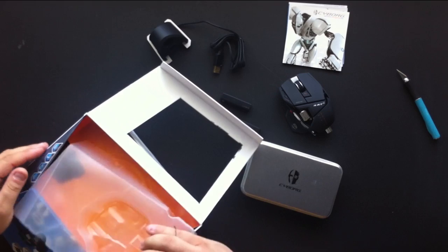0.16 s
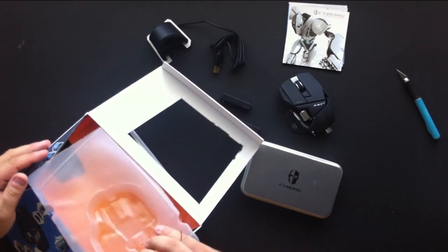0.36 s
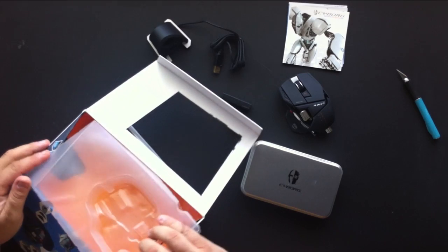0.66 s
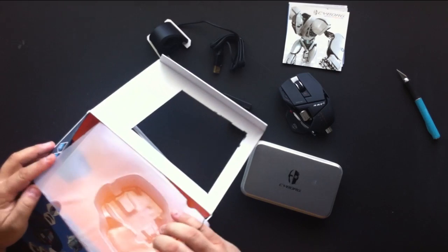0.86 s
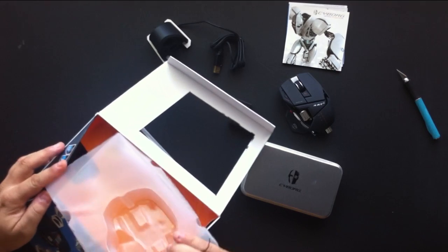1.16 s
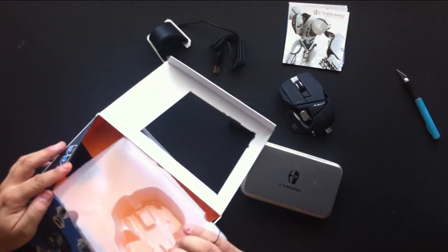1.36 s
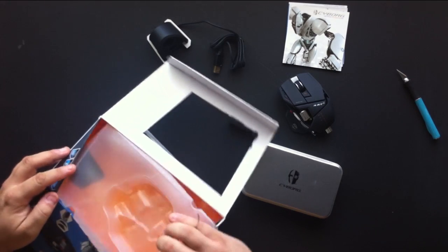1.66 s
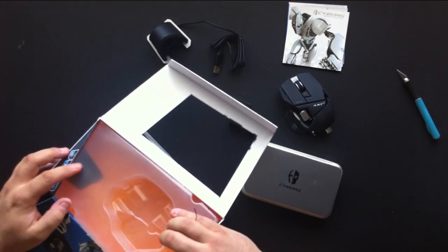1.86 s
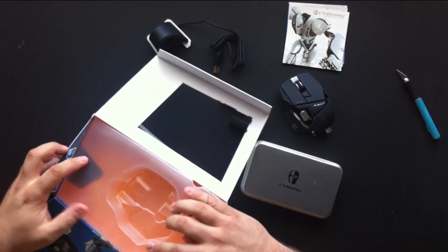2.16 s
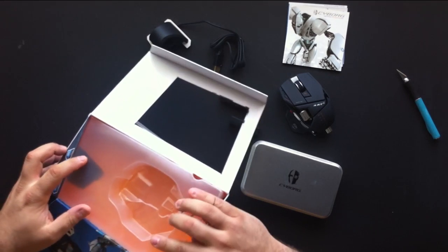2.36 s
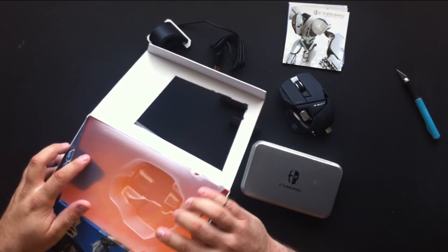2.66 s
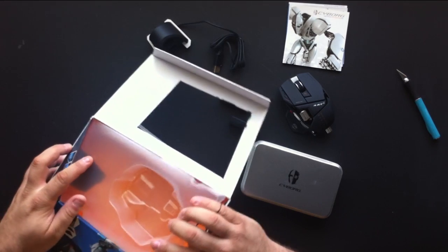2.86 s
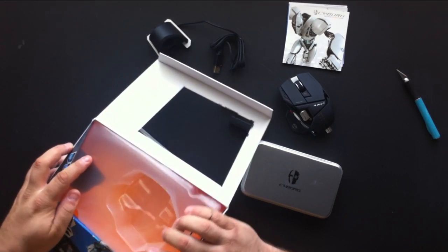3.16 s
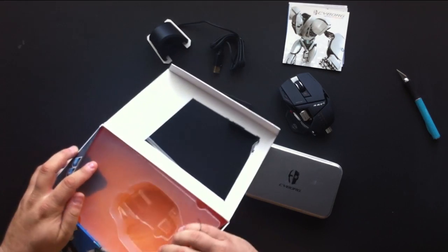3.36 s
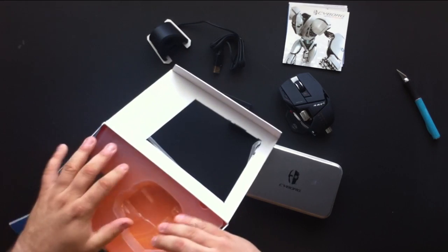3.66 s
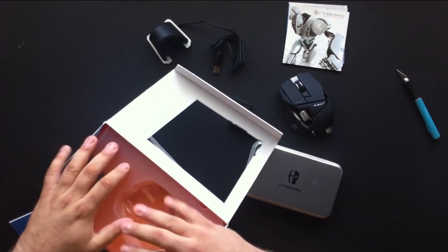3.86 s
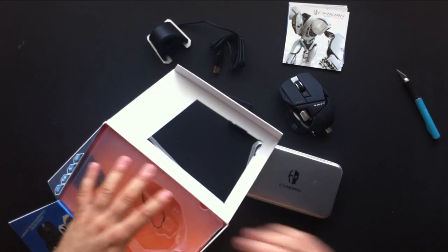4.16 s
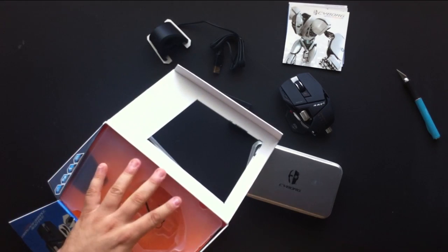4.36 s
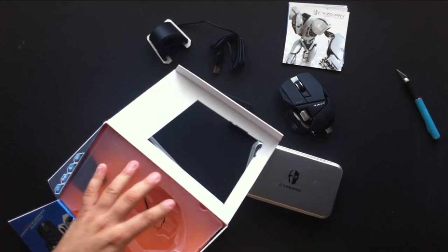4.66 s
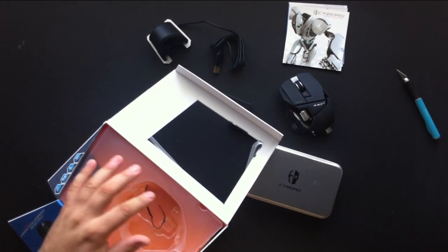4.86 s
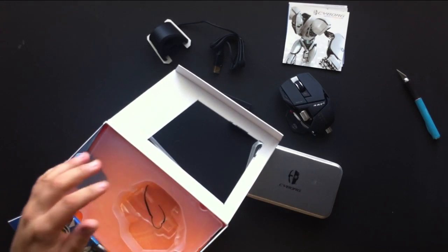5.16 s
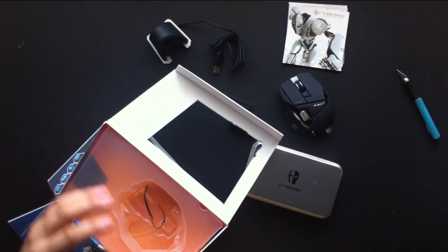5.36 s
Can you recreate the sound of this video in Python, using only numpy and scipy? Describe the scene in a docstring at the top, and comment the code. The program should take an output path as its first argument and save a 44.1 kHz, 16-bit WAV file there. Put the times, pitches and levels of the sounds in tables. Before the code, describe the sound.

A faint steady electrical hum and soft hiss lie under everything in a small room with a short echo, picked up closely. From about 0.2 to 0.6 seconds, a plastic tray knocks the cardboard box in a loose cluster of hollow, boxy taps with brief rubs. It grows quieter until 1.4, with only faint scuffing. At 1.44 a bright plastic click and double knock break out, followed by more clacks and scrapes from 1.65 to 1.9. After softer rubbing, a knock at 2.5 leads to the loudest, sharpest snap at 2.65. Stuttering scrapes and crinkles run from 2.8 to 3.5, then a firm knock lands at 3.57 with smaller ones to 3.85. From 3.95 to 4.45 light, dry clicks scatter through gentle finger rubbing. Sparse hollow finger taps come near 4.95 and 5.13, a short brush at 5.23, then a faint last rub fading into the room's quiet.

```python
"""Two hands press a moulded plastic tray back into a cardboard box on a table, in a small room.
A faint hum of sine lines and a hiss of shaped noise are there from the start and lie under everything.
Soon the tray knocks on the box, as damped modes with noisy cracks, and rubs down its walls by stick-slip.
Then patches of the thin plastic click as they buckle, and the tray snaps into place.
Late on, the plastic still clicks while fingers tap the hollow tray and brush it."""
import sys
import numpy as np
from scipy import signal
from scipy.io import wavfile
from scipy.ndimage import uniform_filter1d

SR = 44100
rng = np.random.default_rng(int(sys.argv[2]) if len(sys.argv) > 2 else 0)


def bounce(signal):
    """Save signal as a 16-bit WAV file at the path given by the first command-line argument."""
    frames = np.transpose(np.atleast_2d(signal))
    limited = np.clip(frames, -1, 1)
    pcm = np.round(limited * 32767).astype(np.int16)
    wavfile.write(sys.argv[1], SR, pcm)


N = 243431


def amp(db):
    """Decibel law: the amplitude ratio of a level."""
    return 10 ** (np.asarray(db) / 20)


def unit(x):
    """Normalisation of power: scales to rms 1."""
    return x / np.sqrt(np.mean(x ** 2) + 1e-20)


def attack_unit(x, size=350):
    """Normalisation of the onset: scales a hit so that its first samples have rms 1."""
    return x / np.sqrt(np.mean(x[:size] ** 2) + 1e-20)


def unit_energy(x):
    """Normalisation of energy: scales the sum of squares to 1."""
    return x / np.linalg.norm(x)


def read(points, hz):
    """Logarithmic pitch scale: interpolates a table along log frequency."""
    f, value = np.transpose(points)
    return np.interp(np.log(hz + 1), np.log(f + 1), value)


def near(hz, centre_hz, octaves):
    """Resonance curve: a bell of height 1 around centre_hz."""
    return 1 / (1 + (np.log2(hz / centre_hz) / octaves) ** 2)


def add(mix, s, sound):
    """Superposition: mixes a sound in at time s."""
    part = mix[max(round(s * SR), 0):][:len(sound)]
    part += sound[:len(part)]


def through(x, response):
    """Convolution: passes x through an impulse response."""
    return signal.oaconvolve(x, response)[:len(x)]


def pulse_of(spectrum, focus_hz=1000, focus_db=0, size=2048):
    """Minimum phase: the shortest causal pulse with this spectrum, raised around focus_hz."""
    hz = abs(np.fft.fftfreq(size, 1 / SR))
    gain_db = read(spectrum, hz) + focus_db * near(hz + 1, focus_hz, octaves=0.062)
    log_gain = np.log(amp(gain_db))
    # the Hilbert transform of the log gain is the phase
    pulse = np.fft.ifft(np.exp(np.conj(signal.hilbert(log_gain)))).real
    return unit_energy(pulse)


def ringing(modes, t):
    """Modal decay: one dying sine a mode, as rows."""
    hz, db, t60 = np.transpose(modes)[:, :, None]
    return amp(db - 60 * t / t60) * np.sin(2 * np.pi * hz * t)


# Spectrum of the hiss. Each row: frequency in Hz, relative density in dB.
HISS_SPECTRUM = [(18, -44), (30, -14), (98, -17), (204, -4), (239, 0), (702, -9.5), (866, 0.5),
                 (962, -10.5), (2750, -15.5), (3870, -18), (5040, -18), (7270, -23), (10200, -24),
                 (16000, -25.5)]
# Lines of the hum. Each row: frequency in Hz, rms level in dB.
HUM_LINES = [(120, -76), (242, -80.5), (759, -96), (894, -80)]


def background(hiss_db=-62.5, waver_rad=0.029):
    """Stationary noise and tones: a steady hiss and a few hum lines of slightly wavering phase."""
    t = np.arange(N) / SR
    hiss = through(rng.standard_normal(N), pulse_of(HISS_SPECTRUM, size=8192))
    out = amp(hiss_db) * unit(hiss)
    knots = np.linspace(0, t[-1], num=40)
    for hz, db in HUM_LINES:
        drift = waver_rad * np.interp(t, knots, rng.standard_normal(len(knots)))
        out += amp(db) * np.sqrt(2) * np.sin(2 * np.pi * hz * t + drift)
    return out


# Decay of the room. Each row: frequency in Hz, t60 in seconds.
ROOM_DECAY = [(150, 0.51), (400, 0.37), (1200, 0.4), (3000, 0.45), (7000, 0.44), (12000, 0.34)]


def echoes(first_s=0.0037):
    """Diffuse reverberation from one place: dense reflections, each band dying at its own speed."""
    t = np.arange(SR // 3) / SR
    reflections = rng.standard_normal(len(t)) * (t > first_s)
    hz, when, bands = signal.stft(reflections, SR, nperseg=256)
    decay = amp(-60 * when / read(ROOM_DECAY, hz)[:, None])
    tail = signal.istft(bands * decay, SR, nperseg=256)[1][:len(t)]
    return unit_energy(tail)


# First reflections from the table and the lid. Each row: delay in seconds, level in dB re the direct sound.
FIRST_REFLECTIONS = [(.0021, -4), (.0049, -4), (.0088, -6)]


def crack(t, t60, contact_s, room_db, tick=0.81):
    """High modal density: a contact sets countless short-lived sheet modes fluttering, like dying noise."""
    first = unit_energy(rng.standard_normal(len(t)) * amp(-60 * t / t60))
    first[0] += tick
    first *= 1 - np.exp(-(t + 1 / SR) / contact_s)  # a soft contact swallows the first tick
    first = unit_energy(first)
    out = first + amp(room_db) * echoes()
    for delay_s, db in FIRST_REFLECTIONS:
        add(out, delay_s, amp(db) * first)
    return out


# Knocks of the tray on the box and, late, finger taps on the hollow tray. Each row: nominal start in
# seconds, relative level in dB, thud of the box in relative dB, hardness (snap) in relative dB,
# Hz at which the box is driven most, Hz at which the tray is driven most.
KNOCKS_AND_TAPS = [(0.1975, -31.5, -3, -9, 516, 800), (0.2485, -39, 1, -21, 352, 990),
                   (0.29, -35, -0.5, -12, 470, 780), (0.309, -41.5, 6, -22, 386.4, 724),
                   (0.424, -37, -12, -13, 350, 1700), (0.467, -37, -5.5, -11.5, 540, 1110),
                   (0.4848, -43.5, 6.5, -6, 361, 1020), (0.6224, -47.5, 1, -13, 360, 790),
                   (0.9034, -53.5, 5.5, -6, 724, 735), (1.2751, -57.5, 13.5, -26, 527, 920),
                   (1.4434, -28, 1.5, -4.5, 473, 1920), (1.4726, -30.5, -4.5, -17, 437, 758),
                   (1.6643, -35.5, -13, -10, 312, 1110), (1.6935, -27, -23, -8.5, 476, 1575),
                   (1.7552, -35.5, -4, -21, 793, 824), (1.8826, -38.5, 8.5, -2, 303, 775),
                   (1.9, -28.5, -6.5, -24.5, 336, 1125), (2.2425, -43, 2.5, -9.5, 590, 1170),
                   (2.5183, -28.5, 3, -19, 418, 1224), (2.6504, -21.5, -2.5, 2, 429, 1220),
                   (2.9266, -41, 0.5, -6, 314, 1160), (3.0671, -42.5, -4.5, -5, 337, 760),
                   (3.235, -41, -0.5, -5.5, 473, 900), (3.5709, -26, -1, -7, 397.5, 974),
                   (3.6512, -40.5, 5.5, 4, 422, 1690), (3.6806, -30.5, -7, -8, 781, 1070),
                   (3.8466, -30, -12, -10.5, 272, 1894), (4.4379, -43.5, -4.5, -14, 414, 1160),
                   (4.9372, -36, -14, -14, 820, 843), (4.9697, -38, -3, -8.5, 750, 730),
                   (5.1255, -44, -3.5, -15, 770, 776)]
# a knock heavier than HEAVY_DB drives the box onto the table: a second, duller knock just after
HEAVY_DB = -35
# delay in seconds, then level, thud and hardness in dB re those of the knock
LANDING_S, LANDING_DB, LANDING_THUD_DB, LANDING_SNAP_DB = .009, -13.5, 9.5, -9


def contacts():
    """Secondary impact: every knock and tap, and after each heavy knock the box landing on the table."""
    rows = list(KNOCKS_AND_TAPS)
    for s, db, thud_rel, snap_rel, box_hz, tray_hz in KNOCKS_AND_TAPS:
        if db > HEAVY_DB:
            levels = db + LANDING_DB, thud_rel + LANDING_THUD_DB, snap_rel + LANDING_SNAP_DB
            rows.append((s + LANDING_S, *levels, box_hz, tray_hz))
    return rows


# Modes of the cardboard box. Each row: frequency in Hz, relative level in dB, undamped t60 in seconds.
BOX_MODES = [(126, -10.5, 0.11), (218, -31, 0.3), (233.2, -12.5, 0.29), (311.4, -2, 0.18),
             (353.7, -6, 0.23), (399.4, 4, 0.056), (457.2, 0.5, 0.085), (483.2, -5, 0.16),
             (550.6, -4.5, 0.076), (619.7, -9.5, 0.097), (682, -5, 0.071), (751, -9, 0.085)]
# Modes of the plastic tray. Each row: frequency in Hz, relative level in dB, undamped t60 in seconds.
TRAY_MODES = [(787, 7, 0.05), (922, 3.5, 0.25), (953, 0, 0.05), (1139, 7, 0.087), (1299, 7, 0.032),
              (1399, 5, 0.041), (1650, -2, 0.23), (1677, 7, 0.066), (1912, -13.5, 0.19), (2370, -8.5, 0.15),
              (2680, -11, 0.14), (3015, 6, 0.04)]
# Modes of the tray's thin rim. Each row: frequency in Hz, relative level in dB, t60 in seconds.
RIM_MODES = [(2683, 14, 0.059), (4810, 10, 0.1), (5700, -10, 0.047), (5820, 13, 0.058), (7570, -17, 0.038)]
# Spectra of the clack, the snap and the top fizz. Each row: frequency in Hz, relative density in dB.
CLACK_SPECTRUM = [(60, -30), (300, -7), (700, 4.5), (1200, 4), (1900, 1.5), (3000, -4), (4000, -6.5),
                  (6000, -10), (8000, -45)]
SNAP_SPECTRUM = [(100, -50), (1500, -24), (3000, -12.5), (4000, -7), (5500, 1.5), (7500, 0.5),
                 (10500, -6.5)]
FIZZ_SPECTRUM = [(300, -60), (5000, -25), (8000, -6), (10000, 0), (13000, -1), (16000, -5)]


def knocks_and_taps(thud_db=-4, push_db=-12, ring_db=-13, clack_db=13, snap_db=13, fizz_db=-7,
                    fizz_per_snap=1.8, rim_db=-16, modes_room_db=-7, spot_db=2, swell_s=0.0014,
                    push_t60=0.22, lag_s=.0007, contact_at_0_db_s=0.00022, softening=1.3):
    """Impact excitation: each contact pushes and rings the box, rings the tray and cracks in thin plastic."""
    t, out = np.arange(SR // 3) / SR, np.zeros(N)
    box, tray = ringing(BOX_MODES, t), ringing(TRAY_MODES, t)
    rim = attack_unit(ringing(RIM_MODES, t).sum(0))
    box_hz, tray_hz = np.transpose(BOX_MODES)[0], np.transpose(TRAY_MODES)[0]
    snap_pulse, fizz_pulse = pulse_of(SNAP_SPECTRUM), pulse_of(FIZZ_SPECTRUM)
    for s, db, thud_rel, snap_rel, box_focus_hz, tray_focus_hz in contacts():
        fizz_rel = fizz_per_snap * snap_rel  # grows faster than the snap as a contact hardens
        contact_s = contact_at_0_db_s * amp(-softening * snap_rel)  # dull contacts are the slow, fleshy ones
        # the place of contact picks which modes speak
        box_share = near(box_hz, box_focus_hz, octaves=0.36)
        tray_share = near(tray_hz, tray_focus_hz, octaves=0.79)
        tray_share *= rng.choice([-1, 1], len(tray_hz))
        tray_share *= amp(spot_db * rng.standard_normal(len(tray_hz)))
        push = ringing([(box_focus_hz, 0, push_t60)], t)[0]  # the card gives way under the contact
        thud = amp(thud_db) * attack_unit(box_share @ box, size=900) + amp(push_db) * attack_unit(push)
        body = amp(thud_rel) * thud + amp(ring_db) * attack_unit(tray_share @ tray)
        body *= 1 - np.exp(-t / swell_s)
        sound = body + amp(modes_room_db) * through(body, echoes())
        sound += amp(rim_db + snap_rel) * rim  # sharp snaps ring the rim
        clack_pulse = pulse_of(CLACK_SPECTRUM, tray_focus_hz, focus_db=12.0)
        clack = crack(t, t60=0.005, contact_s=contact_s, room_db=4)
        snap = crack(t, t60=0.019, contact_s=contact_s, room_db=2)
        fizz = crack(t, t60=0.0024, contact_s=contact_s, room_db=-13.0)
        sound += amp(clack_db) * through(clack, clack_pulse)
        sound += amp(snap_db + snap_rel) * through(snap, snap_pulse)
        sound += amp(fizz_db + fizz_rel) * through(fizz, fizz_pulse)
        add(out, s + lag_s, amp(db) * sound)
    return out


def slips(per_s, spread_db):
    """Stick-slip friction: a train of tiny releases that come in clumps, a few of them large."""
    size = amp(spread_db * np.minimum(rng.exponential(1, N), 4))
    grip = amp(1.8 * unit(uniform_filter1d(rng.standard_normal(N), size=600)))
    released = rng.random(N) < per_s / SR
    return unit(grip * size * rng.choice([-1, 1], N) * released)


RUB_ATTACK_S, RUB_RELEASE_T60 = 0.029, 0.08


def pressure(t, length):
    """Normal force of one rub: a quick grip, an even hold, a dying release."""
    grip = np.minimum(t / RUB_ATTACK_S, 1) ** 2
    since_release = np.maximum(t - length - RUB_ATTACK_S / 2, 0)
    return grip * amp(-60 * since_release / RUB_RELEASE_T60)


def damped_body(modes, t, hand_t60):
    """Added damping: modes of alternating sign, all dying faster under the hand."""
    signs = (-1) ** np.arange(len(modes))
    return (signs @ ringing(modes, t)) * amp(-60 * t / hand_t60)


# Rubs of the tray on the card and, late, of fingertips on the plastic. Each row: start in seconds
# (middle of the grip), length in seconds, scrape in relative dB, rumble of the box in relative dB.
RUB_STROKES = [(0.399, 0.042, -53, -50), (0.477, 0.065, -60, -47.5), (0.618, 0.071, -61, -51),
               (0.714, 0.11, -69, -57), (0.964, 0.046, -62.5, -54.5), (1.19, 0.14, -78, -60.5),
               (1.636, 0.21, -53, -52), (1.826, 0.051, -48, -49), (1.882, 0.057, -67, -39),
               (2.115, 0.075, -58, -51.5), (2.216, 0.12, -73, -52.5), (2.434, 0.13, -59, -48.5),
               (2.77, 0.041, -46, -42), (2.894, 0.14, -63, -53.5), (3.059, 0.19, -53.5, -53),
               (3.212, 0.087, -52.5, -58.5), (3.275, 0.081, -45, -51), (3.436, 0.17, -52, -52.5),
               (3.649, 0.016, -41.5, -43.5), (3.692, 0.02, -50, -45), (3.805, 0.054, -55, -46),
               (3.926, 0.23, -60.5, -63), (4.116, 0.14, -55.5, -67), (4.429, 0.028, -47.5, -50.5),
               (4.545, 0.025, -58.5, -85), (4.708, 0.02, -54.5, -69), (4.799, 0.058, -58.5, -60.5),
               (4.947, 0.041, -51.5, -53), (5.227, 0.05, -43.5, -55), (5.393, 0.14, -72, -99)]
# Spectrum of the scrape. Each row: frequency in Hz, relative density in dB.
SCRAPE_SPECTRUM = [(60, -40), (200, -23), (600, 4), (1000, 7.5), (1800, -2), (3000, -7), (4200, -7),
                   (5800, -9), (9000, -14.5), (15500, -25)]
# Spectrum of buckling plastic, for crinkle and clicks. Each row: frequency in Hz, relative density in dB.
CLICK_SPECTRUM = [(100, -41), (600, 2.5), (1500, 8.5), (3000, 9.5), (5500, -4.5), (8000, -10), (16000, -40)]
# a faint, wandering contact of the hands that never rests from HOLD_FROM_S on
HOLD_FROM_S, HOLD_SCRAPE_DB, HOLD_RUMBLE_DB, HOLD_WANDER_DB = .2, -63.5, -64, 0.5
# from this time on the edge no longer hisses; fingers move and the plastic still clicks
EDGE_UNTIL_S = 4.0


def rubbing(scrape_db=-3.5, ring_db=-9, rumble_db=-3, edge_db=-17, crinkle_db=-11,
            tray_hand_t60=0.24, box_hand_t60=0.66):
    """Friction-driven resonance: slips scrape, ring the tray and shake the box, both damped by the hand.
    The plastic crinkles under the load, and its edge hisses on the card until EDGE_UNTIL_S."""
    t = np.arange(N) / SR
    wander = unit(uniform_filter1d(rng.standard_normal(N), size=4000))
    holding = (t > HOLD_FROM_S) * amp(HOLD_WANDER_DB * wander)
    scrape, rumble = amp(HOLD_SCRAPE_DB) * holding, amp(HOLD_RUMBLE_DB) * holding
    for s, length, high_db, low_db in RUB_STROKES:
        press = pressure(t[:SR // 2], length)
        add(scrape, s - RUB_ATTACK_S / 2, amp(high_db) * press)
        add(rumble, s - RUB_ATTACK_S / 2, amp(low_db) * press)
    fine = scrape * slips(per_s=3000, spread_db=3.5)
    coarse = rumble * slips(per_s=500, spread_db=4)
    crinkle = scrape * slips(per_s=120, spread_db=3)
    edge = fine * (t < EDGE_UNTIL_S)
    box = damped_body(BOX_MODES, t[:SR // 3], box_hand_t60)
    tray = damped_body(TRAY_MODES, t[:SR // 3], tray_hand_t60)
    paths = [(fine, pulse_of(SCRAPE_SPECTRUM), scrape_db),
             (fine, tray, ring_db),
             (coarse, box, rumble_db),
             (edge, pulse_of(SNAP_SPECTRUM), edge_db),
             (crinkle, pulse_of(CLICK_SPECTRUM), crinkle_db)]
    return sum(amp(db) * through(drive, unit_energy(body)) for drive, body, db in paths)


# Clicks of the thin plastic buckling. Each row: nominal start in seconds, relative level in dB,
# top fizz in relative dB, Hz at which the patch rings.
BUCKLING_CLICKS = [(1.4422, -18, -11, 1870), (1.6932, -32.5, -15, 1680), (2.3106, -46, -20, 1670),
                   (2.519, -34, 0, 1720), (2.6507, -14.5, -0.5, 2500), (2.909, -36, -14, 1500),
                   (3.133, -39.5, -2, 1640), (3.47, -29, -5, 4400), (3.4762, -33.5, -13, 2680),
                   (3.5719, -35, -20, 1670), (3.802, -35, -27, 2560), (3.8464, -28.5, -17, 1690),
                   (3.9537, -29.5, -10.5, 2730), (4.131, -29.5, -20, 2930), (4.1442, -31, -30, 2330),
                   (4.2072, -37, -28, 2060), (4.229, -37, -30, 2960), (4.3078, -35.5, -34, 1780),
                   (4.4371, -31.5, -18, 1660), (4.575, -43, -15, 2730), (4.7837, -44, -1.5, 1650)]


def clicks(click_db=8.0, fizz_db=8, lag_s=0.00028):
    """Snap-through buckling: thin plastic flips at once, a short, bright click, alone or on top of a blow."""
    t, out = np.arange(SR // 3) / SR, np.zeros(N)
    for s, db, fizz_rel, patch_hz in BUCKLING_CLICKS:
        flip = crack(t, t60=.008, contact_s=1 / SR, room_db=-3, tick=1.3)
        colour = amp(click_db) * pulse_of(CLICK_SPECTRUM, patch_hz, focus_db=11)
        colour += amp(fizz_db + fizz_rel) * pulse_of(FIZZ_SPECTRUM)
        add(out, s + lag_s, amp(db) * through(flip, colour))
    return out


def scene(rub_room_db=-3, lowest_hz=125):
    """Superposition of sources: the handling, its echo and the quiet of the room."""
    rub = rubbing()
    handling = knocks_and_taps() + clicks() + rub + amp(rub_room_db) * through(rub, echoes())
    # low cut: the handling carries little below lowest_hz
    low_cut = signal.butter(2, lowest_hz, "highpass", fs=SR, output="sos")
    handling = signal.sosfilt(low_cut, handling)
    return (handling + background())[None]


def record(dry, edge_hz=16000):
    """Band limiting: a steep linear-phase low-pass at edge_hz."""
    low_pass = signal.firwin(401, edge_hz, window=("kaiser", 8), fs=SR)
    return signal.oaconvolve(dry, low_pass[None], "same")


dry = scene()
out = record(dry)
bounce(out)
```